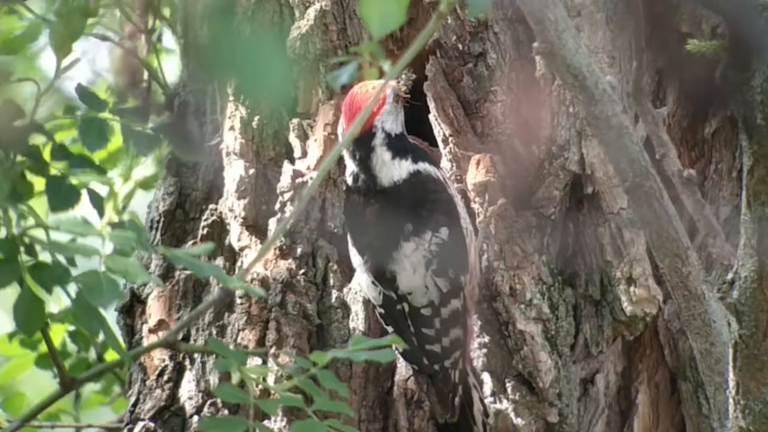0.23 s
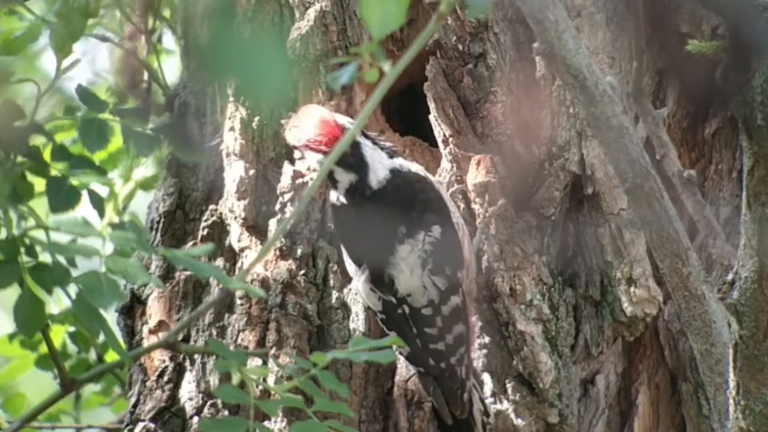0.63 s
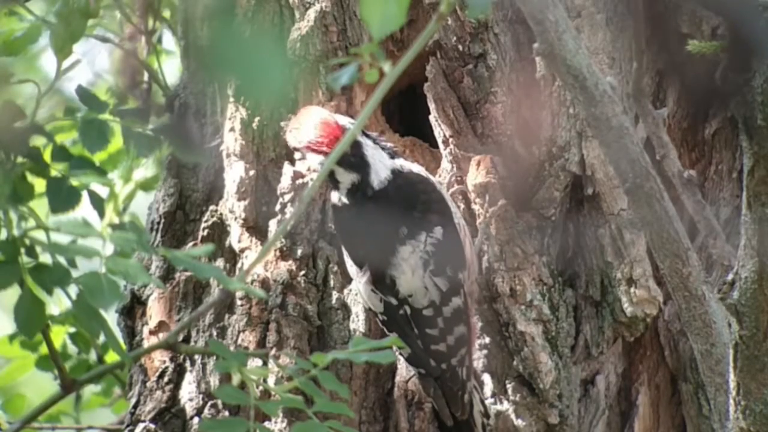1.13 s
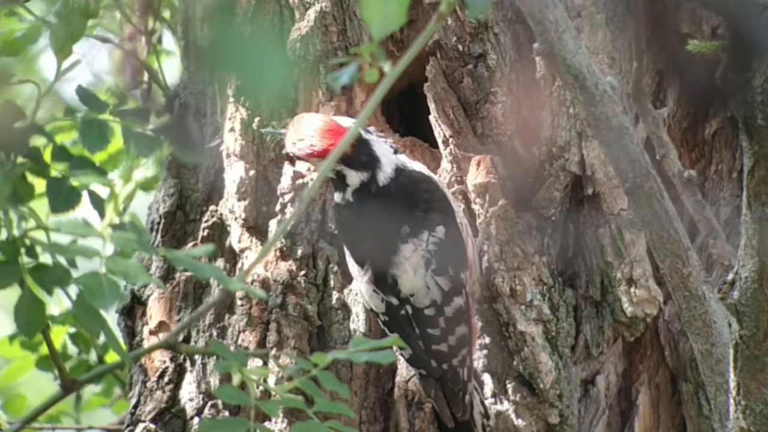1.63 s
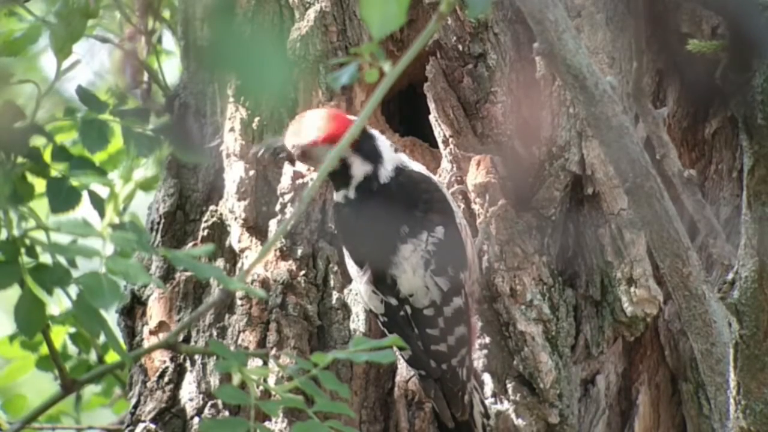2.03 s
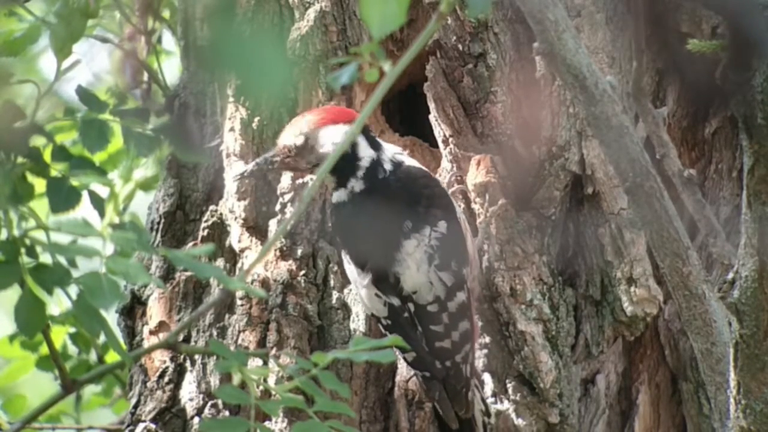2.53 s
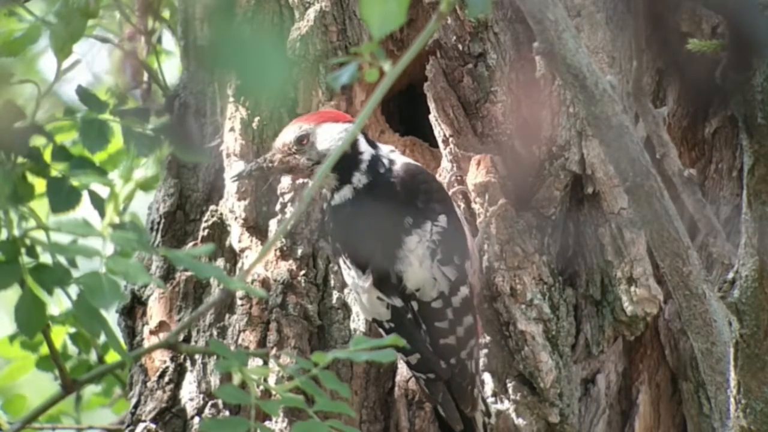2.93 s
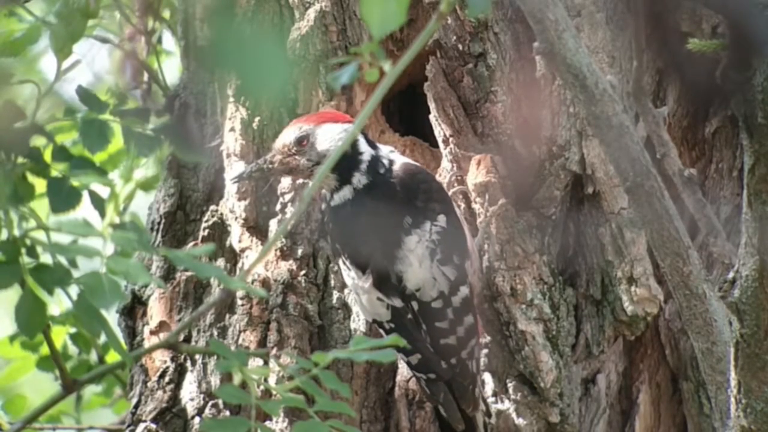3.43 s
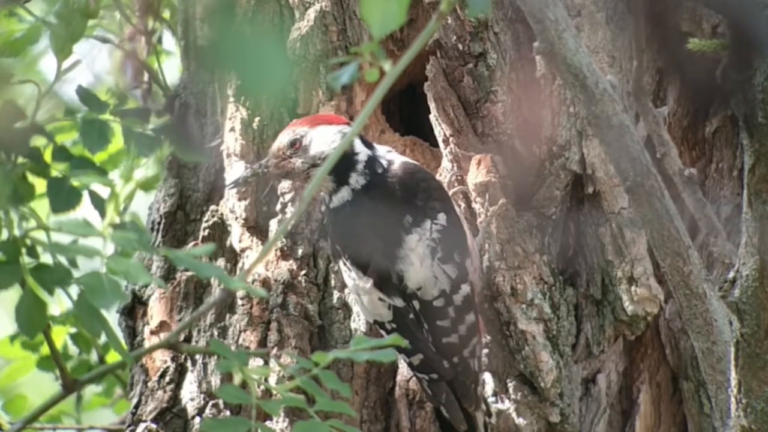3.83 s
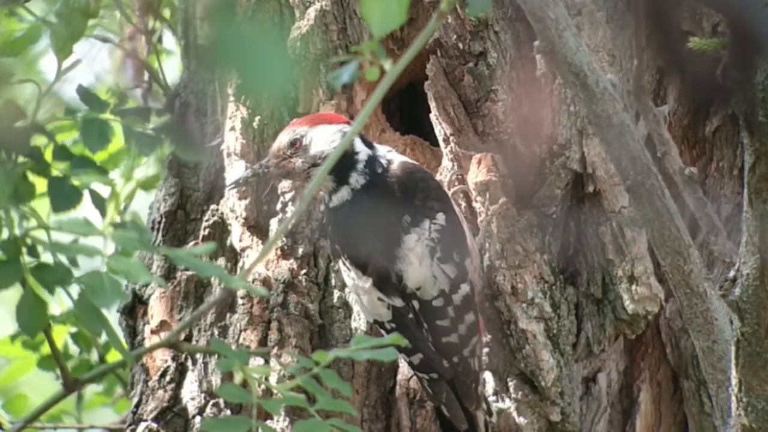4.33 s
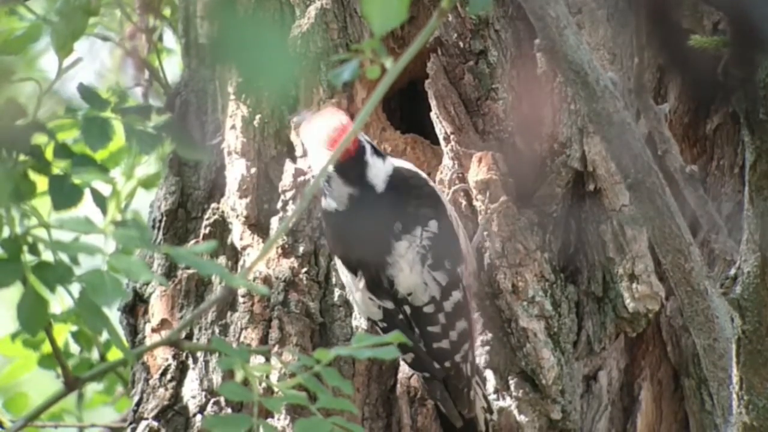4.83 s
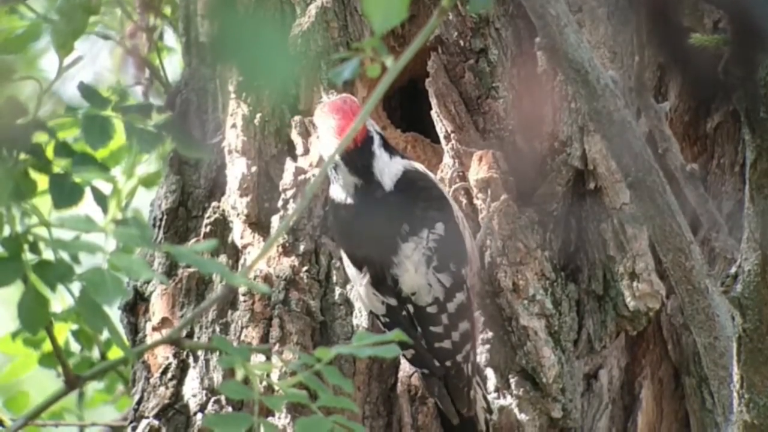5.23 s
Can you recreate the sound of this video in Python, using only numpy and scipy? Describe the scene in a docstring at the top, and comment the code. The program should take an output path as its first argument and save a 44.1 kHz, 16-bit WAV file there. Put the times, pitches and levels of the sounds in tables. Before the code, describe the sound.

In a forest, a nearby woodpecker calls seven times, in a group of four and a group of three. The squawks are sharp, very short and slightly hoarse, each sweeping upward and echoing lightly off the trunks. Leaves hiss and a low, distant roar runs evenly underneath, wide in stereo. Around the middle, a small bird far from the microphone adds faint, thin chips and one high whistle.

```python
"""A steady forest rush fades in, a distant low roar under the hiss of leaves. From a nearby trunk a
woodpecker gives seven short, rising squawks, four and then three, its syrinx sweeping the harmonics
through the resonances of throat and bill. The trees return a soft echo and a ringing tail; far off,
a small bird chips and whistles thinly through the foliage. The stereo microphone has two ports,
of which the left rings like a narrow tube; a limiter holds the calls down."""
import sys
import numpy as np
from scipy import signal
from scipy.fft import rfft, irfft, next_fast_len
from scipy.io import wavfile
from scipy.ndimage import uniform_filter1d, minimum_filter1d, map_coordinates

SR = 44100
rng = np.random.default_rng(int(sys.argv[2]) if len(sys.argv) > 2 else 0)


def inscribe(sig):
    """Save sig as 16-bit PCM at rate SR to the path in sys.argv[1].

    A 1-D sig is mono; a 2-D sig holds one channel per row.
    Samples are clipped to [-1, 1] before scaling.
    """
    pcm = np.round(np.clip(np.atleast_2d(sig).T, -1, 1) * 32767)
    wavfile.write(sys.argv[1], SR, pcm.astype(np.int16))


N = 242550


def amp(db):
    """Decibels to gain."""
    return 10 ** (np.asarray(db) / 20)


def unit(x):
    """Scale to rms 1."""
    return x / np.sqrt(np.mean(x ** 2) + 1e-20)


def along(points, hz):
    """Read (f/Hz, value) points on a log frequency axis."""
    f, v = np.transpose(points)
    return np.interp(np.log(hz + 1), np.log(f + 1), v)


def wobble(rate, size):
    """A smooth random curve, rate knots a second."""
    knots = np.arange(size) * rate / SR
    return map_coordinates(rng.standard_normal(int(knots[-1]) + 4), [knots])


def filtered(x, response):
    """Pass x through a frequency response."""
    m = next_fast_len(N + SR // 2)
    return irfft(rfft(x, m) * response(np.fft.rfftfreq(m, 1 / SR)), m)[..., :N]


def causal(gain):
    """The minimum-phase response that has these gains."""
    cepstrum = irfft(np.log(gain))
    half = len(cepstrum) // 2
    cepstrum[1:half] *= 2
    cepstrum[half + 1:] = 0
    return np.exp(rfft(cepstrum))


def add(track, s, sound):
    """Mix a sound into a track from time s."""
    part = track[round(s * SR):][:len(sound)]
    part += sound[:len(part)]


def patchy_noise(patchy_db):
    """Two unrelated noises whose level varies in patches of time and frequency."""
    spectrum = signal.stft(rng.standard_normal((2, N)), nperseg=512)[2]
    patches = uniform_filter1d(rng.standard_normal(spectrum.shape[1:]), size=6, axis=0)
    patches = uniform_filter1d(patches, size=16, axis=1)
    return signal.istft(spectrum * amp(patchy_db * unit(patches)), nperseg=512)[1][:, :N]


def forest_rush(hiss_db, patchy_db, drift_db):
    """A distant roar, its lows alike at both ports, under the diffuse hiss of leaves."""
    # spectra of the roar and of the leaves: f/Hz, relative level/dB
    roar_spectrum = [(20, -34), (50, -26), (100, -13.5), (200, -4), (330, 0.5), (500, -2.5), (800, -3.5),
                     (1200, -9), (1700, -23), (3000, -43), (6000, -72)]
    leaf_spectrum = [(200, -34), (800, -3), (1600, 2), (1900, -1.5), (2500, -1.5), (4000, -3.5),
                     (5600, -6.5), (6100, -14.5), (7200, -13.5), (9700, -16.5), (11800, -9), (13000, -17.5),
                     (14200, -30), (15600, -45)]
    # likeness of the roar at the two ports: f/Hz, correlation
    likeness = [(60, 0.92), (160, 0.906), (270, 0.88), (450, 0.74), (740, 0.13), (1200, -0.29)]
    # slow swell of the rush: t/s, level/dB
    swell = [(.4, -27.5), (1.2, -26.5), (3.1, -26.5), (3.7, -25.5), (4.4, -27.5), (5.5, -27)]

    def mid_and_side(hz):
        spread = np.arccos(np.clip(along(likeness, hz), -1, 1)) / 2
        return amp(along(roar_spectrum, hz)) * [np.cos(spread), np.sin(spread)]

    mid, side = filtered(patchy_noise(patchy_db), mid_and_side)
    roar = unit(np.array([mid + side, mid - side])) * amp(drift_db * wobble(6.15, N))
    hiss = unit(filtered(patchy_noise(patchy_db=1.0), lambda hz: amp(along(leaf_spectrum, hz))))
    t = np.arange(N) / SR
    level_db = np.interp(t, *np.transpose(swell))
    fade_in = np.clip((t - 0.13) / 0.28, 1e-7, 1) ** 0.7
    return fade_in * amp(level_db) * (amp(-0.97) * roar + amp(hiss_db) * hiss)


def gesture(t, run_up, hold, climb, fall, start_hz, hold_hz, creep_hz, leap_hz, crest_hz,
            hold_db, drop_db, rasp_db, bright_db):
    """Pitch and levels of a squawk: run-up, pure hold on the throat's resonance, break, climb, fall."""
    break_s, attack_s, pure_s = 0.002, 0.0034, 0.0072
    onset_db, arch_db, attack_db, pure_db = -25.5, 2.5, 6.5, 5.5
    fall_hz_per_s2, fade_db_per_s, release_db_per_s = 346000, 135, 400
    since_hold = np.maximum(t - run_up - hold, 0)
    since_crest = np.maximum(since_hold - climb, 0)
    rising, holding, climbing = np.clip([t / run_up, (t - run_up) / hold, since_hold / climb], 0, 1)
    broken = 1 - np.exp(-since_hold / break_s)
    climb_hz = crest_hz - hold_hz - creep_hz - leap_hz
    pitch = (start_hz + (hold_hz - start_hz) * rising + creep_hz * holding + leap_hz * broken
             + climb_hz * (1 - (1 - climbing) ** 1.5) - fall_hz_per_s2 * since_crest ** 2)
    # the fundamental swells late in the run-up and peaks in the middle of the hold
    swell_db = onset_db + (hold_db - onset_db) * rising ** 1.83 - arch_db * (2 * holding - 1) ** 2
    fundamental_db = swell_db - drop_db * broken - fade_db_per_s * since_hold
    # the overtones come in fast, then dip early in the hold
    dip_db = pure_db * np.exp(-((t - run_up - 0.2 * hold) / pure_s) ** 2)
    overtone_db = rasp_db + (bright_db - rasp_db) * holding - dip_db - attack_db * np.exp(-t / attack_s)
    release_db = release_db_per_s * since_crest
    return pitch, fundamental_db - release_db, overtone_db - release_db


def squawk(shape, hoarse_db, slope_db, jitter, creak, shimmer_db, edge_s):
    """The syrinx sweeps upward; each harmonic flares as it crosses a throat resonance."""
    # throat and open bill, with two main resonances: f/Hz, gain/dB
    throat = [(500, -22), (800, -10), (950, -8), (1100, 1.5), (1250, -1), (1400, -5), (1800, -12),
              (2200, 2), (2700, -5), (3000, -6.5), (3500, -14), (4200, -18), (6000, -40)]
    t = np.arange(-edge_s, sum(shape[:4]) + edge_s, 1 / SR)
    pitch, fundamental_db, overtone_db = gesture(t, *shape)
    # slack membranes catch unevenly at the low start of the sweep
    slack = np.clip((1000 - pitch) / 400, 0, 1)
    pitch = pitch * (1 + (jitter + creak * slack) * wobble(363, len(t)))
    phase = 2 * np.pi * np.cumsum(pitch) / SR
    voice = np.zeros(len(t))
    for k in range(1, 6):
        rolloff_db = slope_db * (k - 2) - 4 * (k > 3)  # weaker still above the third harmonic
        source_db = fundamental_db if k == 1 else overtone_db + rolloff_db
        flutter_db = shimmer_db * (1 + slack) * wobble(212, len(t))
        # turbulent air smears the overtones far more than the fundamental
        smear = min(amp(hoarse_db) * k ** 2, 0.3)
        tone = (1 + smear * wobble(701, len(t))) * np.sin(k * phase)
        tone += smear * wobble(695, len(t)) * np.cos(k * phase)
        voice += amp(source_db + flutter_db + along(throat, k * pitch)) * tone
    gate = np.clip(np.minimum(t - t[0], t[-1] - t) / edge_s, 0, 1) ** 2
    return t[0], voice * gate


def woodpecker():
    """The bird on its trunk: the voice towards the microphone, and the voice spilled among the trees."""
    # squawks: t/s, run-up/s, hold/s, climb/s, fall/s, start/Hz, hold/Hz, creep in the hold/Hz,
    # leap at the break/Hz, crest/Hz, hold level/dB, drop at the break/dB, run-up overtones/dB,
    # climb overtones/dB, step per overtone/dB, hoarseness/dB, spill/dB
    squawks = [(1.341, .017, 0.01347, .042, 0.015, 810, 1080, 105, 115, 1567, -3.5, 4.5, -17, -13.5, -7.5, -26, -1.5),
               (1.778, .018, .014, 0.042, .014, 825, 1093, 75, 54, 1506, -4.7, 4.5, -15, -19.5, -11.5, -24, 2),
               (2.226, .026, 0.02, .032, 0.0074, 536, 1033, 55, 10, 1451, -5, 6.5, -14, -17, -3.5, -25.5, 3.5),
               (2.668, 0.023, .014, .034, .014, 785, 1148, 90, 5, 1433, -3.5, 3, -16.5, -18.5, -12, -22, 4.5),
               (3.926, .004, .017, 0.024, 0.015, 1280, 1253, 30, 0, 1368, -3, 4, -14, -12.5, -18, -35, 0.5),
               (4.24, .031, .018, .037, 0.0235, 485.6, 1008, 110, 110, 1402, -2.5, 4, -14, -12.5, -2, -29, -1.5),
               (4.726, .035, 0.017, .025, .025, 589, 1195, 65, 0, 1383, -2, 3, -13.5, -13, -5, -31.5, -2.5)]
    # the bill points off mic, so the highest overtones miss the straight path: f/Hz, gain/dB
    off_axis = [(1000, 1.5), (1950, 0.5), (2250, -10.5), (2650, 3), (3100, -1.5), (3900, -5.5), (6000, -18)]
    near, spilled = np.zeros(N), np.zeros(N)
    for s, *shape, slope_db, hoarse_db, spill_db in squawks:
        offset_s, voice = squawk(shape, hoarse_db, slope_db,
                                 jitter=0.0031, creak=0.014, shimmer_db=0.7, edge_s=0.00293)
        add(near, s + offset_s, voice)
        add(spilled, s + offset_s, amp(spill_db) * voice)
    return filtered(near, lambda hz: amp(along(off_axis, hz))), spilled


def arrival(hz, delay_s, db, lead_ms):
    """One path to the two ports; its direction makes the left one lead or lag."""
    return amp(db) * np.exp(-2j * np.pi * hz * np.array([[delay_s - lead_ms / 1000], [delay_s]]))


def trunk_echoes(x):
    """Single trunks throw back weak, duller copies, the clearest from the right."""
    # echo paths: delay/s, level/dB, lead at the left port/ms
    trunks = [(0.012, -19, 0.383), (0.028, -16.5, -0.24), (.058, -17, .3), (.096, -11, -0.39)]
    # what rough bark reflects: f/Hz, gain/dB
    bark = [(1200, -3.5), (1800, -3), (2300, -19), (2700, -5), (4000, -11)]
    return filtered(x, lambda hz: amp(along(bark, hz)) * sum(arrival(hz, *trunk) for trunk in trunks))


def wood_tail(x, build_s):
    """Scatter from many trees builds up, then dies at each frequency's own speed."""
    # ring time of the wood: f/Hz, t60/s
    decay = [(500, 1.3557), (1200, 0), (2700, 0.4907), (4200, 0.27), (6000, 0.5954)]
    # colour of its tail: f/Hz, gain/dB
    colour = [(500, -11.5), (1100, 9.5), (1500, 1), (2300, 8.5), (3000, 12), (4200, 18.5), (5000, 13),
              (7000, -4)]
    hz, t, noise = signal.stft(rng.standard_normal((2, SR)), SR, nperseg=256)
    envelope = amp(-60 * t / along(decay, hz)[:, None]) * (1 - np.exp(-t / build_s))
    tail = signal.istft(noise * envelope, SR, nperseg=256)[1]
    wet = signal.fftconvolve(x[None], tail / np.linalg.norm(tail[0]), axes=1)[:, :N]
    return filtered(wet, lambda hz: amp(along(colour, hz)))


def small_bird(step_s, chip_s, glide):
    """Far off, two phrases of three thin, falling chips, with a high, quavering whistle between."""
    # chip phrases: t/s, level/dB
    phrases = [(2.525, -34), (4.068, -35)]
    # starting pitch of each chip in a phrase: f/Hz
    chip_hz = [5780, 4750, 4140]
    # the whistle: t/s, length/s, start/Hz, end/Hz, level/dB
    whistle = (3.14, .16, 7620, 7450, -42)
    chips = [(s + k * step_s, chip_s, hz, hz * glide, db)
             for s, db in phrases for k, hz in enumerate(chip_hz)]
    track = np.zeros(N)
    for s, length, start_hz, end_hz, db in chips + [whistle]:
        progress = np.linspace(0, 1, round(length * SR))
        quaver = 1 + 0.0127 * wobble(203, len(progress))
        pitch = start_hz * (end_hz / start_hz) ** progress * quaver
        swell = amp(db + 3.5 * wobble(85, len(progress))) * np.sqrt(np.abs(np.sin(np.pi * progress)))
        add(track, s, swell * np.sin(2 * np.pi * np.cumsum(pitch) / SR))
    return track


def through_leaves(x, t60):
    """Foliage scatters a far voice into a short blur."""
    t = np.arange(SR // 4) / SR
    blur = rng.standard_normal((2, len(t))) * amp(-60 * t / t60)
    return signal.fftconvolve(x[None], blur / np.linalg.norm(blur[0]), axes=1)[:, :N]


def left_port(x):
    """The microphone's left port rings like a narrow tube and colours all that enters it."""
    # broad response against the right port: f/Hz, gain/dB
    slope = [(100, -3), (700, -3), (1200, -1.5), (2000, 1.5), (2500, -8.5), (3100, -14), (4000, -9.5),
             (6200, -8.5), (9400, -5.5), (12000, -15), (15000, 1)]
    # tube resonances and notches: f/Hz, width/Hz, gain/dB
    modes = [(1727, 375, 15), (4581.5, 450, 17), (5380, 267, -26), (6970, 490, 10.5), (8190, 670, -20)]

    def response(hz):
        tube_db = sum(db / (1 + (2 * (hz - centre) / width) ** 2) for centre, width, db in modes)
        return causal(amp(along(slope, hz) + tube_db))

    return filtered(x, response)


def limiter(x, top_db, recovery_s):
    """Loud peaks pull the gain down at once; it creeps back afterwards."""
    peak = -minimum_filter1d(-np.abs(x).max(axis=0), size=180)
    over_db = np.maximum(20 * np.log10(peak + 1e-9) - top_db, 1e-9)
    age = np.arange(N) / SR / recovery_s
    cut_db = np.exp(np.maximum.accumulate(np.log(over_db) + age) - age)
    return x * amp(-uniform_filter1d(cut_db, size=180))


def scene():
    """At the microphone: the forest's rush, the near woodpecker, the answering trees, the far bird."""
    near, spilled = woodpecker()
    balance = amp([[-1.5], [1.5]])
    straight = balance * filtered(near, lambda hz: arrival(hz, delay_s=0, db=0, lead_ms=0.056))
    trees = trunk_echoes(spilled) + amp(-12.0) * wood_tail(spilled, build_s=0.025)
    far = through_leaves(small_bird(step_s=0.025, chip_s=0.0233, glide=0.91), t60=0.072)
    rush = forest_rush(hiss_db=-6.0, patchy_db=0.8, drift_db=0.53)
    return rush + straight + trees + far


def record(dry):
    """Both ports, the left one ringing, feed a limiter; the band ends steeply in the high treble."""
    top_hz = 15650
    ports = np.array([left_port(dry[0]), dry[1]])
    held = limiter(ports, top_db=-3.0, recovery_s=0.04)
    return filtered(held, lambda hz: hz < top_hz)


dry = scene()
out = record(dry)
inscribe(out)
```